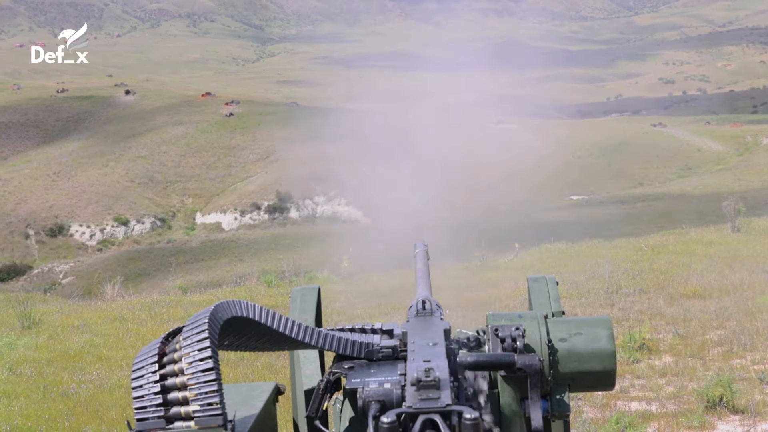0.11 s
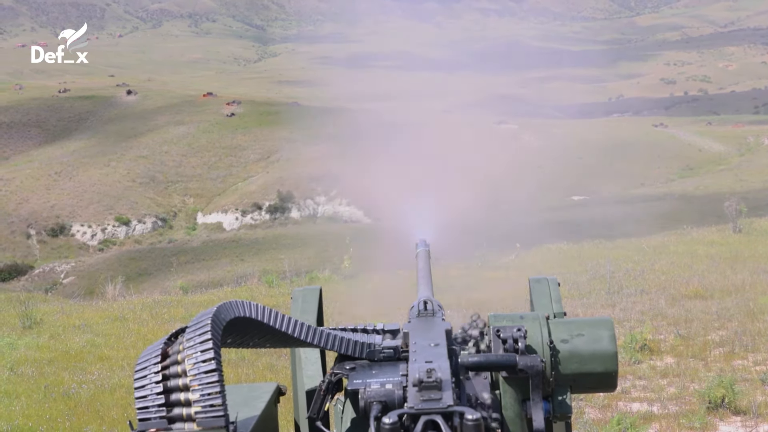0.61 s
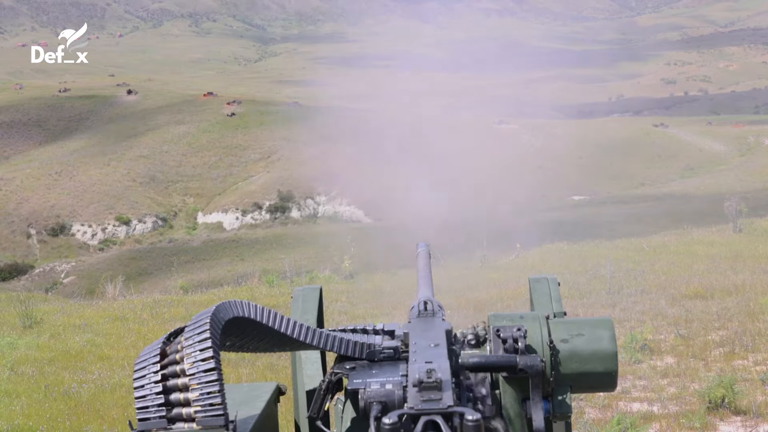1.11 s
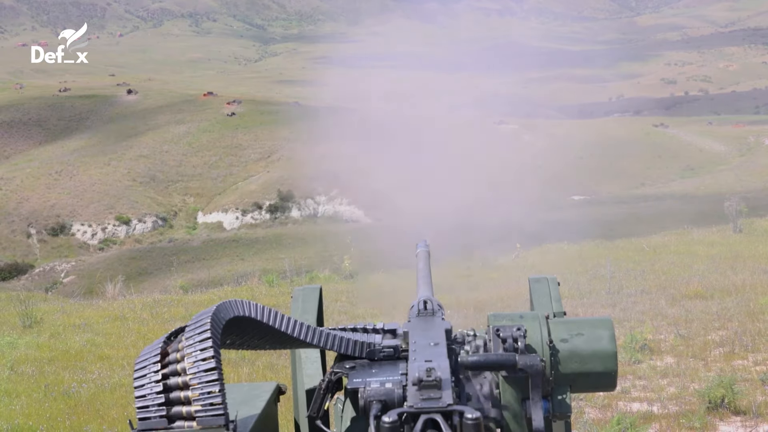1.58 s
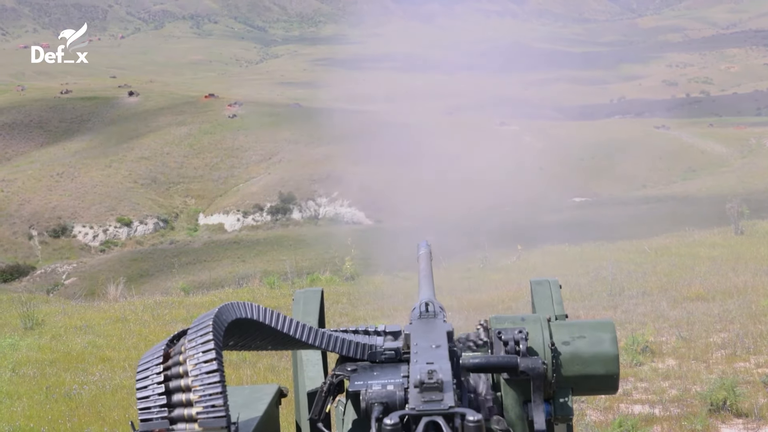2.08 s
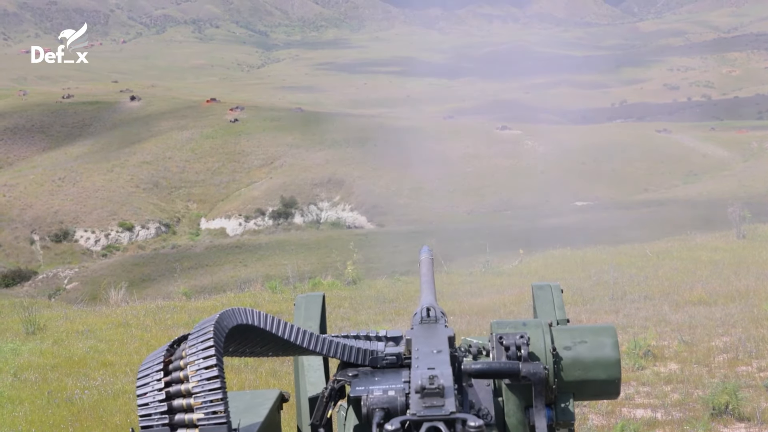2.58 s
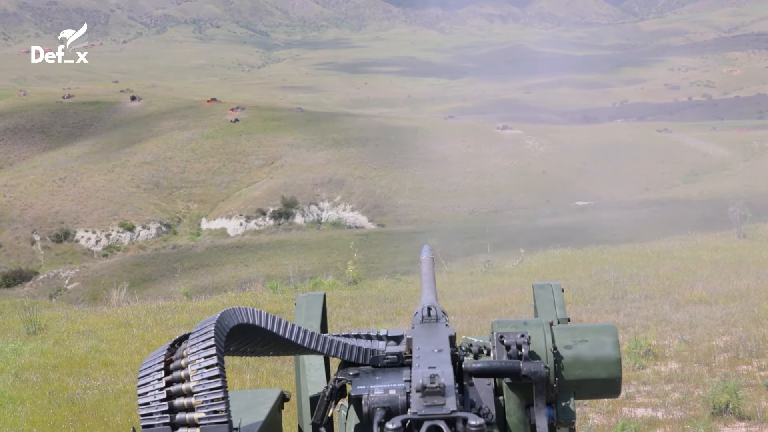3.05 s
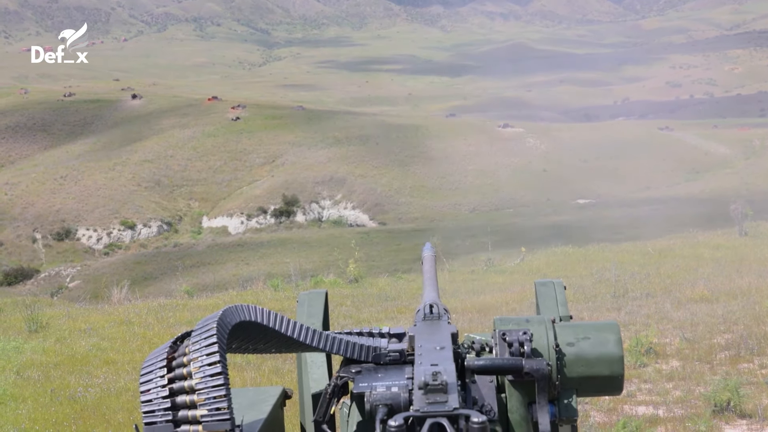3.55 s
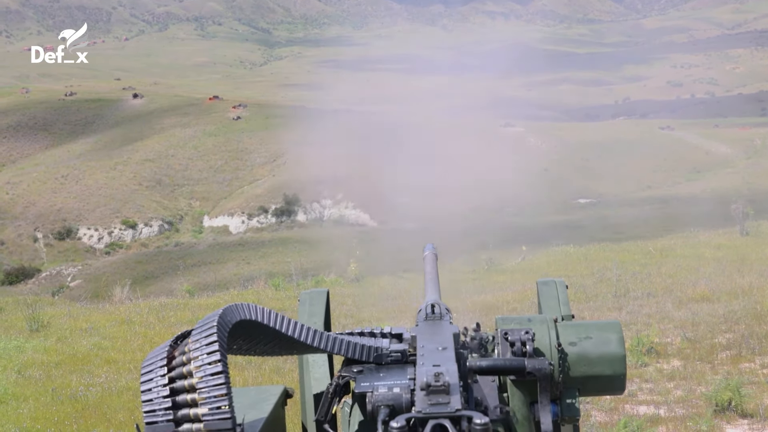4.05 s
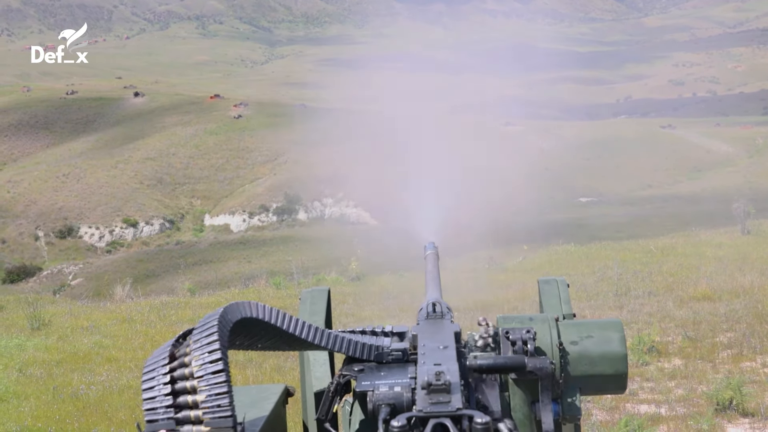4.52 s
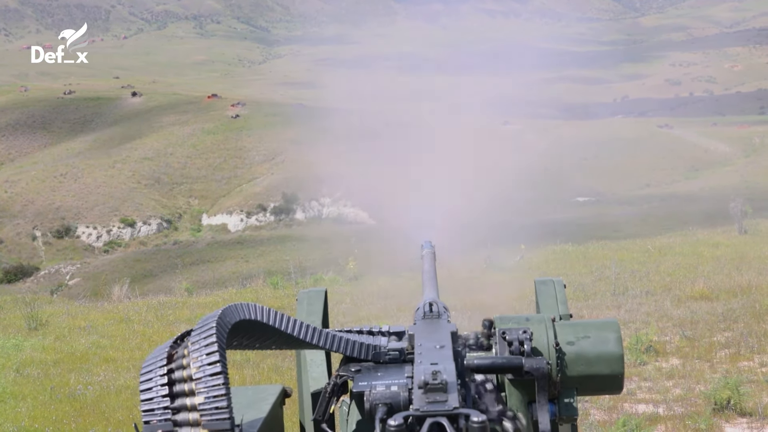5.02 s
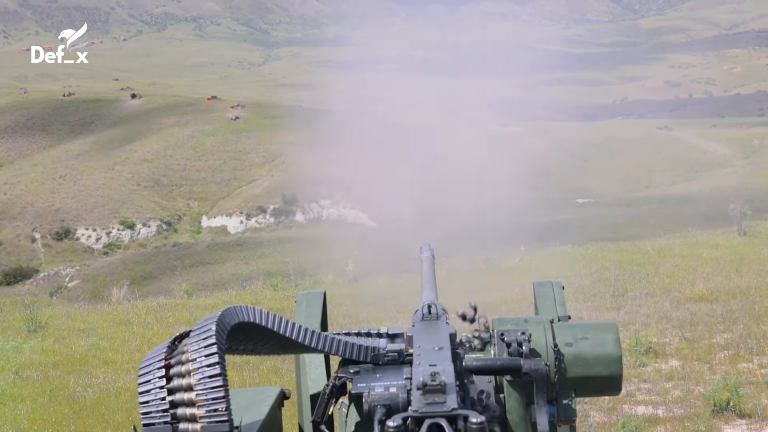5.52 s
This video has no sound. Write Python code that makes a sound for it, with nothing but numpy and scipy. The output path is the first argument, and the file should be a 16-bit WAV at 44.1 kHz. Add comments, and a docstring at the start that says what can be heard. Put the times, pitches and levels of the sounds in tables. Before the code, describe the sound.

Loud, slightly saturated close microphone with thinned deep bass: steady automatic fire, steely and clanging, with bolt rattle before each shot and a sharp echo after it. After two seconds the gun falls silent, leaving bright brass tinkles, soft low thumps from far slopes and a rising airy roar. Firing resumes abruptly, a touch faster, and is cut off while still going.

```python
"""Hard, steely blasts come first: two long bursts of a heavy machine gun, with a pause between them,
over open hills, from just behind. Each shot sums fixed swelling modes of mount and hull with decaying
gas noise. Its blast returns from two obstacles as thud and hiss; bolt rattles are short filtered noise.
Spent brass jingles as struck decaying modes with noisy ticks. In the pause a background roar of coloured
noise rises, and the valley answers with a lumpy rumble and dull thumps of damped sines."""
import sys
import numpy as np
from scipy import signal
from scipy.fft import rfft, irfft
from scipy.io import wavfile

SR = 44100
rng = np.random.default_rng(int(sys.argv[2]) if len(sys.argv) > 2 else 0)


def bounce(signal):
    """Save signal as a 16-bit WAV file at the path given by the first command-line argument."""
    frames = np.transpose(np.atleast_2d(signal))
    limited = np.clip(frames, -1, 1)
    pcm = np.round(limited * 32767).astype(np.int16)
    wavfile.write(sys.argv[1], SR, pcm)


def magnitude_from_level(level_db):
    """Linear magnitude for a level in decibels (20 dB per decade)."""
    exponent = np.asarray(level_db, float) / 20
    return 10 ** exponent


N = 248283

# moments at which the shots fire: (time [s])
SHOT_TIMES = [-.0992, 0.0359, 0.1725, 0.3183, 0.4544, 0.5944, 0.7378, 0.8815, 1.0429, 1.1871, 1.3311,
              1.4733, 1.6132, 1.7644, 1.9028, 2.0419, 3.7028, 3.8313, 3.9702, 4.1, 4.231, 4.364, 4.4967,
              4.6368, 4.7683, 4.898, 5.0271, 5.1653, 5.302, 5.4332, 5.5693]


def band(x, hz, width):
    """Band-limiting: a Butterworth filter passes the width around a centre frequency."""
    edges = [max(hz - width / 2, 30), min(hz + width / 2, .45 * SR)]
    return signal.sosfilt(signal.butter(2, edges, "bandpass", fs=SR, output="sos"), x)


def unit(x):
    """Normalization: scale to rms 1."""
    return x / np.sqrt(np.mean(x ** 2))


def add(out, sound, s):
    """Superposition: mix a sound in from time s [s] on, clipped to the scene."""
    i = int(round(s * SR))
    a, b = max(i, 0), min(i + len(sound), N)
    out[a:b] += sound[a - i:max(b - i, a - i)]


def firing_db():
    """Level contour: each burst opens with an excess that eases sigmoidally to a settled level."""
    # the bursts: (opening time [s], excess level [dB], time of half excess [s], easing time constant [s])
    bursts = [(-.1, 6, .1, 0.14), (3.6, 3.6, 4.54, 0.085)]
    settled_db, opening_shot_db, opening_s = -23.5, 2.05, 0.075
    t = np.arange(N) / SR
    db = np.full(N, settled_db)
    for opens, excess_db, half, over in bursts:
        db = db + (t > opens) * excess_db / (1 + np.exp((t - half) / over))
    # the first shot after the pause is lifted further, and the lift decays
    first = SHOT_TIMES[np.argmax(np.diff(SHOT_TIMES)) + 1]
    lift = opening_shot_db * np.exp(-np.clip(t - first, 0, None) / opening_s)
    return db + (t > bursts[-1][0]) * lift


def rings(modes, ms):
    """Modal superposition: each damped mode swells from its start and dies away."""
    out = 0
    for hz, db, start, swell in modes:
        age = np.clip(ms - start, 0, None)
        envelope = age / swell * np.exp(1 - age / swell)
        out = out + magnitude_from_level(db) * envelope * np.sin(2 * np.pi * hz * age / 1000)
    return out


def mount_ring(ms):
    """Impulse response: blast and recoil wake the modes of mount and hull in turn, alike in every shot."""
    # modes of mount and hull: (frequency [Hz], relative level [dB], start after the blast [ms], swell [ms])
    mount_modes = [(61, -11, 24.5, 4.5), (147.4, -8, 2, 9.6), (193.3, -5.5, 43.5, 5.7),
                   (211.2, -5, -3.5, 15), (208.6, -7, 37.5, 6.2), (250, -11.5, 43.5, 16.8),
                   (267, -1.5, 18, 1.8), (332.9, -10, 4, 15.5), (384.3, -13, 0, 16.5), (558.6, 0, 8.5, 5.9),
                   (492, -29, 24.5, 3), (604, -13, -1.5, 7.8), (713, 1.5, 2.5, 1.25), (640, 1.5, 21, 1.64),
                   (835, 4.5, 9.5, 1.18), (884, -8, 21.5, 2.9), (1220, 4.5, 12, 0.44),
                   (1211, -1.5, 13.5, 3.7), (1312, 5, 15, 0.9), (1494, 0, 1, 2.7), (1605, -8, 10.5, 9.6),
                   (1864, -1, 2, 0.82), (1900, -3.5, 24.5, 1.8), (1974, -0.5, 15, 1.75),
                   (2177, -7.5, 4, 5.2), (2372, -1, 4.5, 0.69), (2340, -2, 19, 1.9), (2618, -9, 5, 3)]
    return rings(mount_modes, ms)


def gas_noise(ms):
    """Turbulent jet noise: each band holds and then decays, over a slower tail, partly alike in all shots."""
    # bands of gas noise: (centre [Hz], width [Hz], relative burst level [dB], burst hold [ms],
    # burst t60 [ms], relative tail level [dB], tail t60 [ms], power share alike in all shots [0-1])
    gas_bands = [(208, 260, -24.5, 58, 99, -13.5, 960, 0.57),
                 (725, 440, -10.5, 13.3, 104, -13.5, 840, 0.46),
                 (1630, 1220, -10, 28.3, 44, -10, 824, 0.45), (2507, 1650, -9, 18.7, 22, -13.5, 410, 0.74),
                 (4430, 3870, -7, 4.6, 61, -20, 720, 0), (7990, 8170, -10, 10.6, 28, -22, 560, 0),
                 (13770, 6400, -13.5, 7.8, 43, -31.5, 690, 0)]
    pin_lead_ms, pin_db = 8.8, -18
    alike = rng.standard_normal(len(ms))
    fresh = rng.standard_normal((len(SHOT_TIMES), len(ms)))
    # the pin strikes just before the blast
    pin = magnitude_from_level(pin_db) * np.clip(1 + ms / pin_lead_ms, 0, 1) ** .5
    onset = np.where(ms > 0, 1, pin)
    gas = 0
    for hz, width, burst_db, hold, burst_t60, tail_db, tail_t60, share in gas_bands:
        common = np.sqrt(share) * unit(band(alike, hz, width))
        own = np.sqrt(1 - share) * unit(band(fresh, hz, width))
        burst = magnitude_from_level(burst_db - 60 * np.clip(ms - hold, 0, None) / burst_t60)
        tail = magnitude_from_level(tail_db - 60 * np.clip(ms, 0, None) / tail_t60)
        gas = gas + (common + own) * onset * (burst + tail)
    return gas


def bolt():
    """Impact noise: the bolt slams just ahead of every shot that closely follows another, a steely rattle."""
    # single rattles, one after the first burst, one at the opening shot of the second,
    # two just after it: (time [s], relative level [dB])
    single_rattles = [(2.1825, -13), (3.6995, -3), (3.803, -15), (3.813, -15)]
    lead_s, slam_db, length_ms = 0.0053, -9.5, 10.4
    shots = np.array(SHOT_TIMES)
    following = shots[1:][np.diff(shots) < .3]
    slams = [(s - lead_s, slam_db) for s in following] + single_rattles
    ms = np.arange(2000) / SR * 1000
    noise = rng.standard_normal((len(slams), len(ms)))
    rattle = unit(band(noise, 1470, 810))
    rattle = rattle + magnitude_from_level(-0.5) * unit(band(noise, 2480, 2200))
    rattle = rattle + magnitude_from_level(-17.0) * unit(band(noise, 5400, 8000))
    rattle = rattle * np.exp(-(ms / length_ms) ** 2)
    out = np.zeros(N)
    for (s, db), sound in zip(slams, rattle):
        add(out, magnitude_from_level(db) * sound, s)
    return out


def echoes(ms):
    """Reflection: two obstacles return the blast as an N-wave, the hull's answering ring and a hiss."""
    # echoes: (delay [ms], relative thud level [dB], thud low-pass [Hz], relative hiss level [dB],
    # hiss length [ms])
    reflections = [(172, -10.5, 1900, -20, 3.6), (211.8, -4.5, 3100, -9.5, 7.5)]
    # hull modes that an echo wakes: (frequency [Hz], relative level [dB], start after the echo [ms], swell [ms])
    hull_modes = [(195, 4, 2.7, 2.0), (269, -7, 9, 5.1), (355, 5, 10.2, 0.5), (632, -3, -1, 1.8),
                  (1013, -4.5, 0.5, 3), (1380, -8, 6.5, 2.4), (1660, -7, -0.5, 1.5), (1990, -4, 11, 0.5),
                  (2030, -3.5, 3, 0.92), (2450, 8, .3, 0.4)]
    scatter_db = .7
    thud, hiss = 0, 0
    for delay, thud_db, top_hz, hiss_db, length in reflections:
        age = ms - delay
        n_wave = magnitude_from_level(5.5) * (1 - age / 1.1) * (age > 0) * (age < 2.3)
        lowpass = signal.butter(2, top_hz, fs=SR)
        thud = thud + magnitude_from_level(thud_db) * signal.lfilter(*lowpass, rings(hull_modes, age) + n_wave)
        hiss = hiss + magnitude_from_level(hiss_db) * (age > 0) * np.exp(-(age / length) ** 2)
    # both echoes of a shot share one random gain
    gain = magnitude_from_level(scatter_db * rng.standard_normal((len(SHOT_TIMES), 1)))
    noise = rng.standard_normal((len(SHOT_TIMES), len(ms)))
    return gain * (thud + hiss * unit(band(noise, 2200, 2250)))


def gun():
    """Source superposition: ring, gas and echoes sound at every shot, together with the bolt."""
    lead = .02  # room for the pin ahead of the blast [s]
    ms = (np.arange(int(.7 * SR)) / SR - lead) * 1000
    shots = mount_ring(ms) + gas_noise(ms) + echoes(ms)
    out = bolt()
    for s, shot in zip(SHOT_TIMES, shots):
        add(out, shot, s - lead)
    # shots, bolt and echoes drift in level together through a burst
    return out * magnitude_from_level(firing_db())


def spill_db(s):
    """Level envelope: small bounces at times s follow the loudest spill, sounding or breaking off."""
    # spills of small cases and links: (start [s], time after which the level drops away steeply [s], starting
    # level [dB],
    spills = [(0, 2.6, -60.5, 1.5), (2.715, 3.04, -61.5, 27), (3.72, 6.5, -50.5, 8.5)]
    cutoff_db_per_s = 200
    levels = []
    for start, stop, db, fade in spills:
        cutoff = cutoff_db_per_s * np.clip(s - stop, 0, None)
        sounding = db - fade * (s - start) - cutoff
        levels.append(np.where(s < start, -150, sounding))
    return np.max(levels, axis=0)


def brass():
    """Modal impact: cases tick on steel and ring; every landing favours other modes."""
    # modes of the brass: (frequency [Hz], relative level [dB], t60 [s])
    brass_modes = [(1529, 1, 0.43), (2923, -8, 0.32), (3880, -15, .3), (4790, -3.5, 0.3), (5740, -9.5, 0.3),
                   (6390, -12, 0.29), (7230, -12, 0.16), (8340, -7.5, 0.26), (8600, -13, .25),
                   (10590, -11, 0.19), (11030, -13, .26), (12400, -10, 0.2), (13060, -15, 0.253),
                   (13950, -11.5, 0.22), (14520, -15, .3)]
    # distinct landings in the pause: (time [s], ring level [dB], favoured mode [Hz], tick level [dB])
    landings = [(2.238, -53, 6390, -67), (2.302, -47.5, 2923, -59), (2.303, -49.5, 1529, -62),
                (2.377, -55, 6390, -63), (2.467, -64, 13950, -51), (2.513, -64, 3880, -56),
                (2.713, -59, 13950, -50), (2.718, -57, 1529, -55), (2.7465, -62, 5740, -44),
                (2.91, -61, 1529, -59), (3.626, -70, 1529, -66)]
    hz, db, t60 = np.transpose(brass_modes)
    # small bounces: chance sets time, level below the spill, and favoured mode
    chance = rng.random((900, 3))
    small_s = chance[:, 0] * N / SR
    small_db = spill_db(small_s) - 14 * chance[:, 1]
    small_hz = hz[(chance[:, 2] * len(hz)).astype(int)]
    small = np.transpose([small_s, small_db - 2.5, small_hz, small_db + 6.0])
    s, ring_db, top_hz, tick_db = np.vstack([landings, small]).T
    at = (s * SR).astype(int)
    # the favoured mode rings at full strength, the others as chance has it
    favoured = np.abs(np.log(hz[:, None] / top_hz)) < .03
    others = magnitude_from_level(db[:, None] - 8.5) * rng.standard_normal((len(s), len(hz))).T
    strikes, ticks = np.zeros((len(hz), N)), np.zeros(N)
    strikes[:, at] = magnitude_from_level(ring_db) * np.where(favoured, 1, others)
    ticks[at] = magnitude_from_level(tick_db)
    age = np.arange(int(.35 * SR)) / SR
    decaying_mode = magnitude_from_level(-60 * age / t60[:, None]) * np.exp(2j * np.pi * hz[:, None] * age)
    # tumbling cases waver in pitch: a random phase walk blurs each line to a 12 Hz width
    steps = rng.standard_normal((len(hz), N)) * np.sqrt(2 * np.pi * 12 / SR)
    blur = np.exp(1j * np.cumsum(steps, axis=1))
    ring = (signal.fftconvolve(strikes, decaying_mode, axes=1)[:, :N] * blur).imag.sum(axis=0)
    # each tick is a puff of noise that trails off in a rattle; time constants 5.3 and 24 ms
    tick = signal.lfilter([1], [1, -np.exp(-1 / (0.0053 * SR))], ticks)
    rattle = signal.lfilter([1], [1, -np.exp(-1 / (0.024 * SR))], ticks)
    noise = rng.standard_normal((2, N))
    tick_noise = unit(band(noise[0], 2270, 3000)) + magnitude_from_level(-14.0) * noise[0]
    rattle_noise = noise[1] + unit(band(noise[1], 2650, 2300))
    return ring + tick * tick_noise + magnitude_from_level(-14.5) * rattle * rattle_noise


def wavering():
    """Amplitude modulation: narrow-band noise near 38 Hz that makes a level flutter."""
    return unit(band(rng.standard_normal(N), 37.7, 21))


def valley_rumble():
    """Diffuse reverberation: a lumpy near rumble dies after the burst; far slopes' rumble arrives later."""
    near_s, near_db, near_fade_db_per_s = 2.32, -58, 20
    far_s, far_db, far_attack_s, far_fade_db_per_s = 2.93, -58.5, .1, 4
    t = np.arange(N) / SR
    near = magnitude_from_level(near_db - near_fade_db_per_s * np.clip(t - near_s, 0, None))
    # the far rumble fades for one second and then holds
    far = magnitude_from_level(far_db - far_fade_db_per_s * np.clip(t - far_s, 0, 1))
    far = far * np.clip((t - far_s) / far_attack_s, 0, 1)
    lumpy = band(rng.standard_normal(N), 170, 270) * magnitude_from_level(2.3 * wavering())
    return unit(lumpy) * np.hypot(near, far)


def background_roar():
    """Spectral shaping: a wavering coloured roar, raised in the pause as recording gain recovers."""
    # spectrum of the roar: (frequency [Hz], relative spectral density level [dB])
    roar_spectrum = [(400, -29), (600, -7), (900, -12.5), (1020, -14.5), (1480, -2.5), (1850, -9.5),
                     (2200, -16), (4000, -29.5), (6000, -42), (9000, -75)]
    from_s, to_s, start_db, rise_db_per_s = 2.37, 3.6, -67, 10.5
    t = np.arange(N) / SR
    # the level is steady before and after the rise
    db = start_db + rise_db_per_s * (np.clip(t, from_s, to_s) - from_s)
    hz = np.fft.rfftfreq(N, 1 / SR)
    knot_hz, knot_db = np.transpose(roar_spectrum)
    colour = magnitude_from_level(np.interp(np.log(hz + 1), np.log(knot_hz), knot_db))
    roar = unit(irfft(rfft(rng.standard_normal(N)) * colour, N))
    return roar * magnitude_from_level(db + 1.2 * wavering())


def valley_thumps():
    """Distant reflection: dull thumps return as strongly damped low sines."""
    # thumps from the valley: (time [s], level [dB], frequency [Hz])
    thumps = [(2.433, -41, 237), (2.746, -44.5, 296), (2.989, -46, 199), (3.06, -45, 172),
              (3.121, -40, 250), (3.328, -47, 150), (3.425, -48, 120), (3.489, -48, 138), (3.519, -43, 150),
              (3.609, -50, 213)]
    age = np.arange(2000) / SR
    out = np.zeros(N)
    for s, db, hz in thumps:
        cycles = age * hz
        envelope = cycles / 0.62 * np.exp(1 - cycles / 0.52)
        add(out, magnitude_from_level(db) * envelope * np.sin(2 * np.pi * cycles), s)
    return out


def scene():
    """Linear superposition: gun, brass, valley and background roar add at one microphone."""
    valley = valley_rumble() + valley_thumps()
    return (gun() + brass() + valley + background_roar())[None]


def band_limit(x):
    """A steep low-pass at the top of the band."""
    return signal.sosfilt(signal.butter(12, 16310, fs=SR, output="sos"), x)


def record(dry):
    """Filtering and saturation: the microphone thins deep bass, rounds loud peaks and cuts the top."""
    x = signal.sosfilt(signal.butter(2, 55, "highpass", fs=SR, output="sos"), dry)
    x = np.tanh(1.8 * x) / 1.8
    x = signal.sosfilt(signal.ellip(10, .2, 60, 14950, fs=SR, output="sos"), x)
    return band_limit(x)


dry = scene()
out = record(dry)
bounce(out)
```